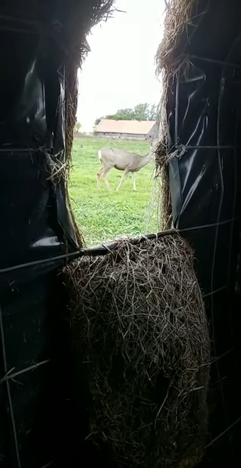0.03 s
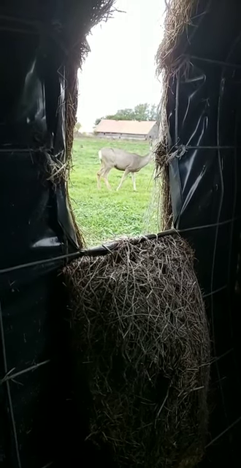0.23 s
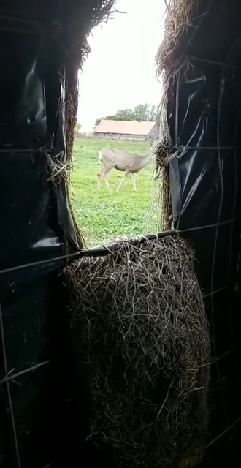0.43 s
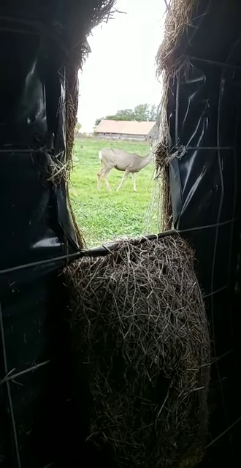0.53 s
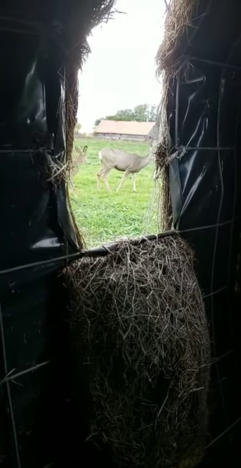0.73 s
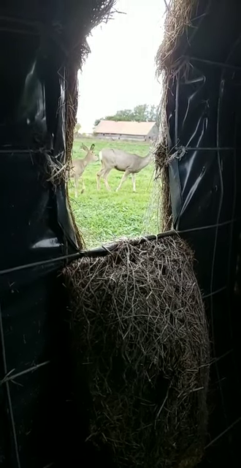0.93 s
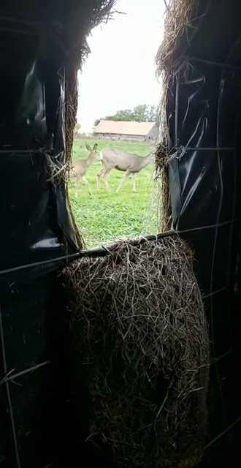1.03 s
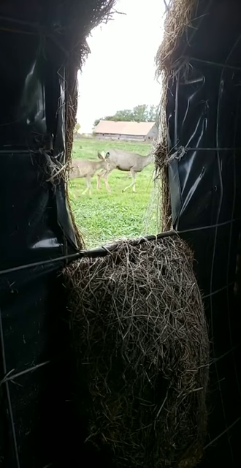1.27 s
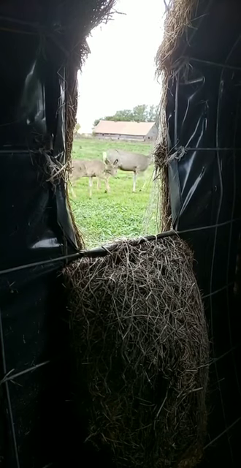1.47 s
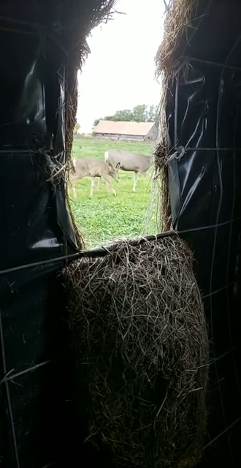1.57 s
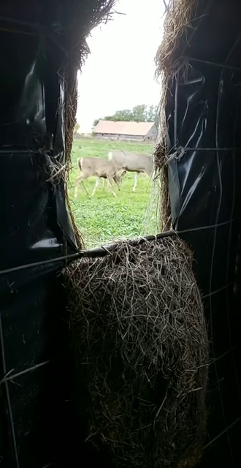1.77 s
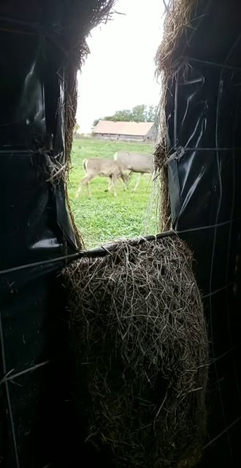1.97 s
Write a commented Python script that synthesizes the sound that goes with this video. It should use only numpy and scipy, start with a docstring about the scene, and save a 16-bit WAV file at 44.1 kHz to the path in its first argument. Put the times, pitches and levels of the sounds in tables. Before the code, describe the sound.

Wind buffets the microphone inside a straw blind on a quiet field. A gust builds into a low, fluttering rumble with soft thumps, then fades to a few weak puffs over a faint hiss.

```python
"""Wind buffets a microphone in a straw blind on a quiet field.
It opens on a deep draught, the field's faint hush and microphone hiss, which last throughout.
From 0.2 s a gust builds: slow air only rumbles, faster air adds a low flutter,
and single eddies thump the port, hardest near 0.5 s.
After 1 s the gust has passed and a few weak puffs follow."""
import sys
import numpy as np
from scipy import signal
from scipy.fft import rfft, irfft, next_fast_len
from scipy.io import wavfile
from scipy.ndimage import uniform_filter1d

SR = 44100
rng = np.random.default_rng(int(sys.argv[2]) if len(sys.argv) > 2 else 0)


def generate_wav(sig):
    """Save sig (samples, or channels by samples) to the path in sys.argv[1] as 16-bit PCM at SR."""
    pcm = np.round(np.clip(np.atleast_2d(sig).T, -1, 1) * 32767).astype(np.int16)
    wavfile.write(sys.argv[1], SR, pcm)


N = 88200


def amp(db):
    """Decibels to gain."""
    return 10 ** (np.asarray(db) / 20)


def unit(x):
    """Scale to rms 1."""
    return x / np.sqrt(np.mean(x ** 2) + 1e-20)


def curve(rows, round_s=0.014):
    """Per-sample curve from (s, value) rows, corners rounded: air cannot change speed at once."""
    ramps = np.interp(np.arange(N) / SR, *np.transpose(rows))
    return uniform_filter1d(ramps, size=int(round_s * SR))


def filtered(x, response):
    """Zero-phase filter with gain response(hz)."""
    size = next_fast_len(N + SR // 2)
    return irfft(rfft(x, size) * response(np.fft.rfftfreq(size, 1 / SR)), size)[:N]


def noise(spectrum):
    """Noise of rms 1, coloured by (Hz, dB) rows on a log axis."""
    row_hz, row_db = np.transpose(spectrum)
    gain = lambda hz: amp(np.interp(np.log(hz + 1), np.log(row_hz + 1), row_db, left=-120, right=-120))
    return unit(filtered(rng.standard_normal(N + SR), gain))


def turbulence(spectrum, steady, span_s):
    """Coloured noise; swells longer than span_s are evened out by the share steady."""
    x = noise(spectrum)
    window = signal.windows.hann(int(span_s * SR) + 3)
    power = signal.fftconvolve(np.abs(signal.hilbert(x)) ** 2, window / window.sum(), "same")
    return unit(x / (np.abs(power) + 1e-6) ** (steady / 2))


def microphone_hiss(flow_db, level_db=-83, lift_db_per_db=0.0633):
    """Thin hiss, lifting slightly with the flow."""
    # Each row: frequency in Hz, relative density in dB.
    spectrum = [(100, -12), (1500, -2), (2900, 1.5), (4200, -1.5), (5500, -5), (7500, -11.5), (9500, -11),
                (11000, -4), (12500, 1), (14000, -1), (15500, -3)]
    to_nyquist = spectrum + [(SR / 2, spectrum[-1][1])]
    lift_db = lift_db_per_db * (flow_db - flow_db.mean())
    return amp(level_db + lift_db) * noise(to_nyquist)


def field_air(draught_db=-68, hush_db=-83.5):
    """Deep draught of air that never quite stops, plus the hush of the field."""
    # Each row: frequency in Hz, relative density in dB.
    draught_spectrum = [(15, -20), (30, -3), (50, 0), (70, -3), (100, -10.5), (170, -25.5), (300, -50)]
    hush_spectrum = [(25, 4.5), (100, 4), (170, 1.5), (280, 5.5), (400, -3.5), (700, -0.5), (1200, -5.5),
                     (2000, -12.5), (5000, -31)]
    return amp(draught_db) * noise(draught_spectrum) + amp(hush_db) * noise(hush_spectrum)


def eddies(low_cut_hz=40, steepness=4.1):
    """One soft pressure push per eddy, through the microphone's low cut; small, fast ones reach higher."""
    # Each row: time in seconds, peak in dB, top of band in Hz.
    hits = [(0.213, -36.5, 64.7), (.289, -32.5, 74), (.414, -25, 180), (0.457, -29.5, 340),
            (.465, -25, 400), (0.496, -33.5, 400), (0.507, -23, 508), (0.517, -31.5, 398.5),
            (0.53, -27.5, 400), (0.535, -22, 80), (0.553, -24.5, 90), (.555, -36, 469), (0.58, -24, 430),
            (0.605, -36.5, 420), (.649, -39, 420), (0.677, -34.5, 500), (0.687, -26, 240),
            (0.707, -36, 400), (0.747, -33, 420), (0.768, -35, 460), (0.798, -27.5, 280),
            (0.844, -31, 111.7), (.939, -38, 400), (0.957, -31, 170), (1.023, -33.5, 109),
            (1.067, -42.5, 170), (1.261, -40.5, 98), (1.463, -37.5, 186), (1.494, -41.5, 133),
            (1.533, -36.5, 79.3), (1.745, -44.5, 81)]
    low_cut = lambda hz: hz ** 2 / np.hypot(hz ** 2, low_cut_hz ** 2)
    out = np.zeros(N)
    for time_s, peak_db, top_hz in hits:
        band = lambda hz: np.exp(-(hz / top_hz) ** steepness) * low_cut(hz)
        push = filtered(signal.unit_impulse(N, round(time_s * SR)), band)
        out += amp(peak_db) * push / push.max()
    return out


def wind(flow_db, full_gust_db=-31, buffet_db_per_db=1.3):
    """Pressure swings at the port: buffet grows faster than rumble; the gust's fast core flutters."""
    # Each row: frequency in Hz, relative density in dB.
    rumble_spectrum = [(15, -35.5), (25, -16.5), (45, -3.5), (62, 1), (85, -5.5), (115, -10.5),
                       (160, -30.5), (260, -48), (450, -78)]
    buffet_spectrum = [(50, -29), (90, 1.5), (120, 3.5), (170, -2.5), (230, -12.5), (300, -20.5),
                       (420, -37.5), (700, -81)]
    flutter_spectrum = [(120, -23.5), (220, 3.5), (290, -6), (390, -10.5), (500, -28), (630, -30),
                        (800, -43), (1200, -77)]
    # Each row: time in seconds, strength of the core in dB.
    gust_core = [(0.35, -85.5), (0.416, -63.5), (0.428, -70), (0.462, -32), (0.484, -57), (0.504, -26),
                 (0.536, -41), (0.584, -41), (0.624, -46.5), (0.684, -42.5), (0.724, -56.5), (0.762, -38.5),
                 (0.906, -75), (0.942, -49.5), (0.956, -73), (1.05, -84)]
    rumble_db = flow_db - 2.5
    buffet_db = -40 + buffet_db_per_db * (flow_db - full_gust_db)
    flutter_db = curve(gust_core) - 4.5
    rumble = amp(rumble_db) * turbulence(rumble_spectrum, steady=0.6, span_s=0.037)
    buffet = amp(buffet_db) * turbulence(buffet_spectrum, steady=0.38, span_s=0.031)
    flutter = amp(flutter_db) * turbulence(flutter_spectrum, steady=0.27, span_s=0.067)
    return rumble + buffet + flutter


def scene():
    """Wind and background at one microphone."""
    # Each row: time in seconds, strength of the air flow at the port in dB.
    air_flow = [(0.0, -75), (0.06, -72.5), (0.09, -62), (0.17, -66.5), (0.19, -45), (0.21, -36),
                (0.26, -43), (0.29, -38), (0.36, -46), (0.42, -32), (0.48, -35.5), (0.54, -27),
                (0.58, -28.5), (0.76, -31), (0.78, -37), (0.83, -30), (0.93, -41), (0.96, -33), (0.99, -55),
                (1.02, -42.5), (1.09, -54.5), (1.12, -48), (1.23, -65.5), (1.25, -62), (1.26, -46.5),
                (1.41, -67), (1.44, -45), (1.54, -51.5), (1.58, -62), (1.66, -70.5), (1.75, -55.5),
                (1.77, -57.5), (1.88, -69.5), (1.96, -58), (2.0, -66)]
    flow_db = curve(air_flow)
    return (wind(flow_db) + eddies() + microphone_hiss(flow_db) + field_air())[None]


def record(dry):
    """Steep low-pass at the recorder's band limit."""
    top_hz = 15750
    low_pass = signal.ellip(12, 0.1, 90, top_hz, fs=SR, output="sos")
    return signal.sosfilt(low_pass, dry)


dry = scene()
out = record(dry)
generate_wav(out)
```